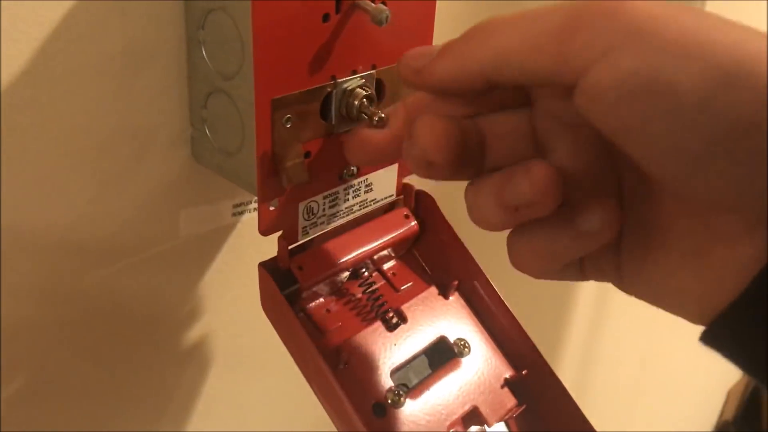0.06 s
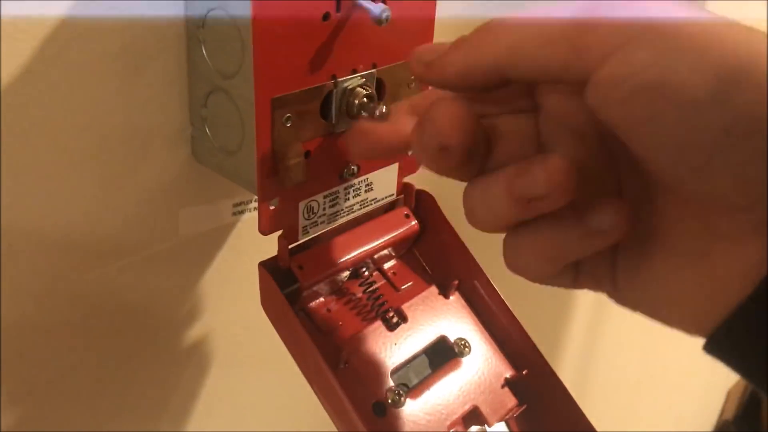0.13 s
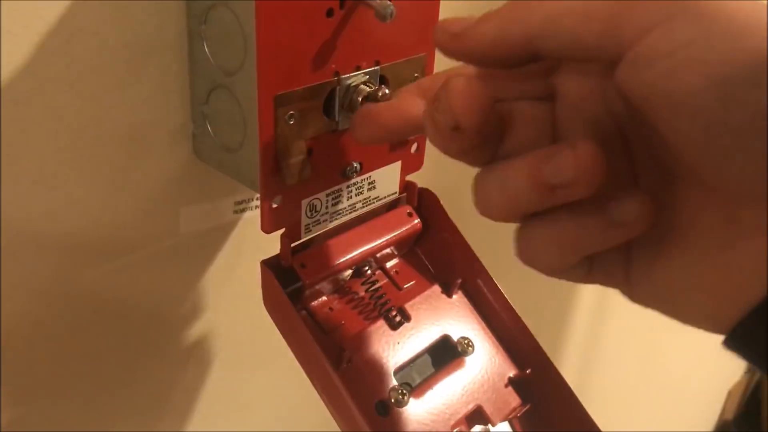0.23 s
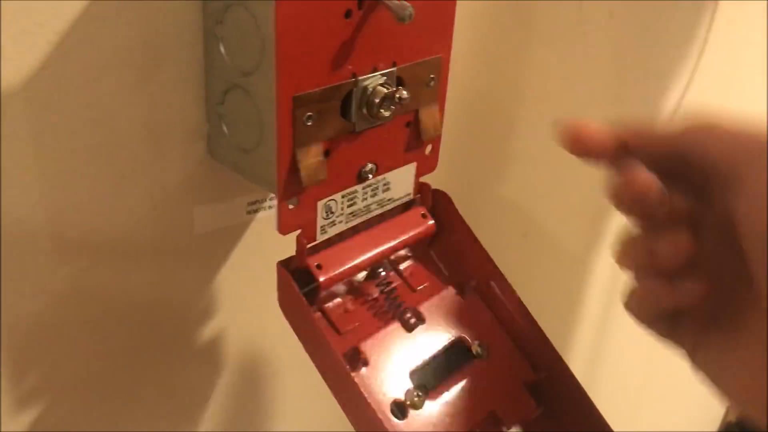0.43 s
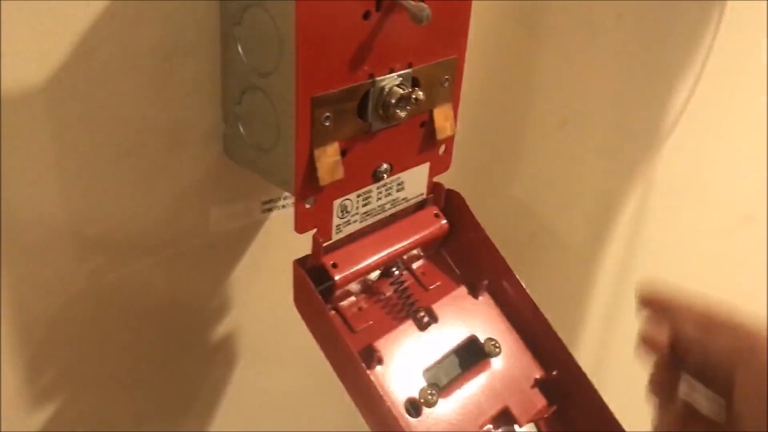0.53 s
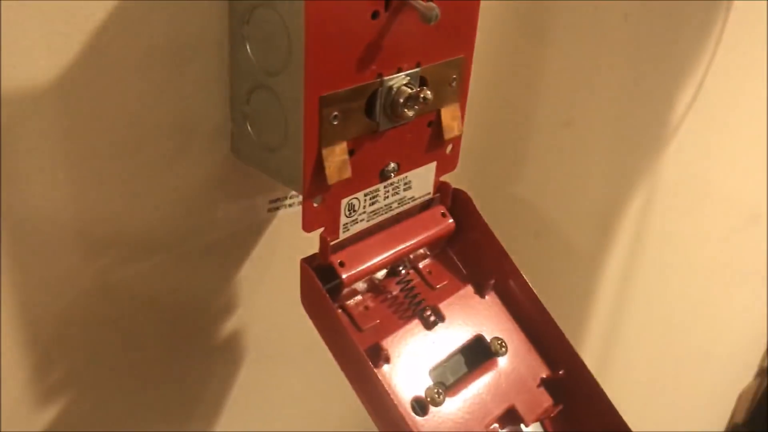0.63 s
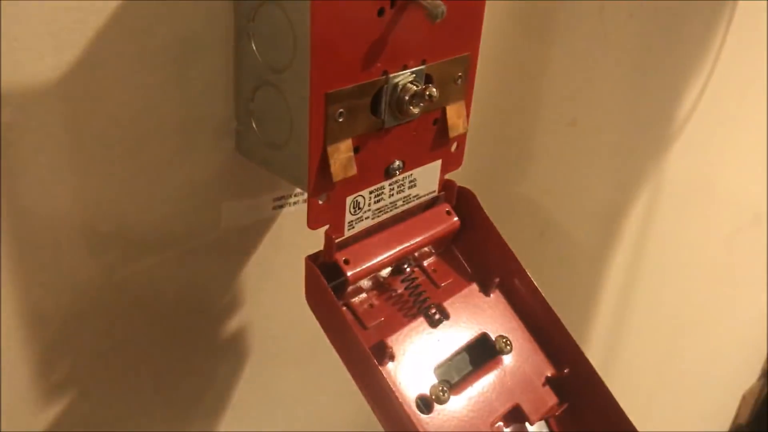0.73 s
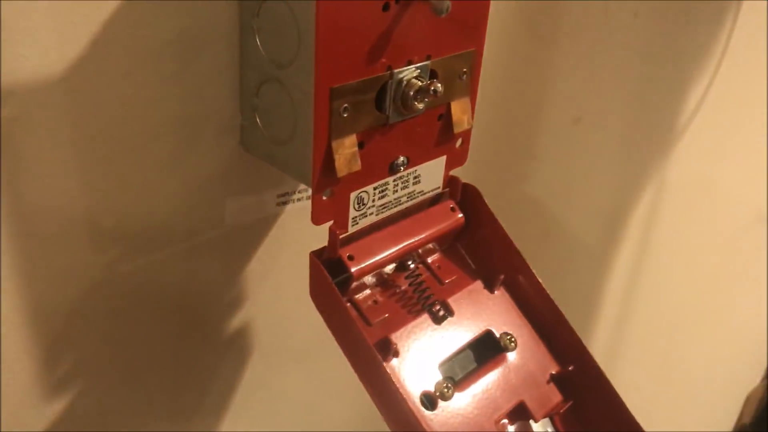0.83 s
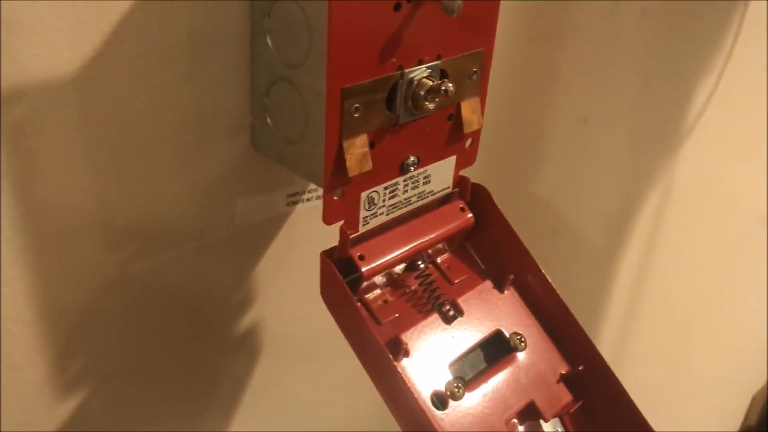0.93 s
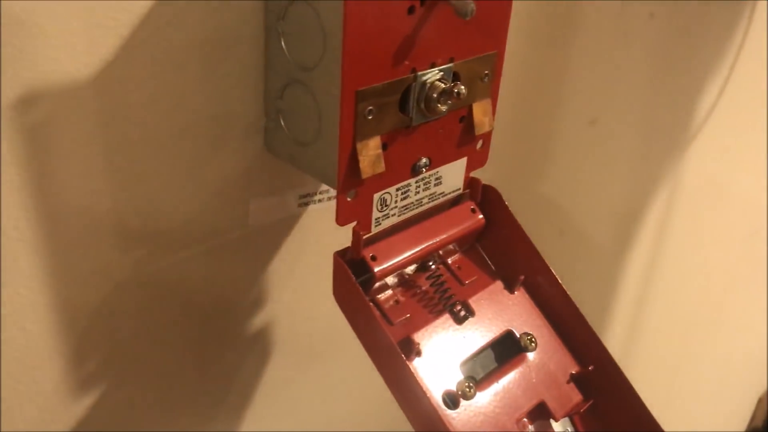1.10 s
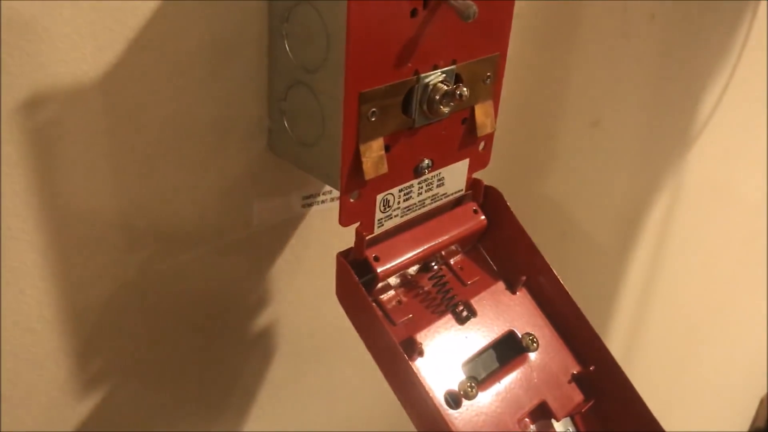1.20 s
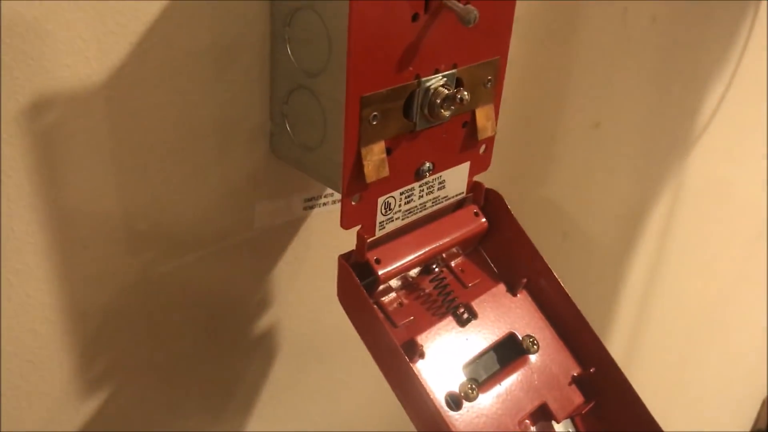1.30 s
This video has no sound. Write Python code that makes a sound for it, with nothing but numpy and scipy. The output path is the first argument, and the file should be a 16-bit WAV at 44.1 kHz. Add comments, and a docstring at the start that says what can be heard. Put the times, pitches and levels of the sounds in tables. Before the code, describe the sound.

A toggle switch snaps once, sharp and bright, at about 0.25 seconds, just after a barely audible fingertip bump and a tiny tick. The snap briefly rings its steel box with a light wall thump, fading in the small room by about 0.6 seconds. From 0.5 to 1.4 seconds come very faint spells of thin, clicking whirr, with another tiny tick near 1.2 seconds, over quiet hiss and hum.

```python
"""A small room hisses and hums faintly. A fingertip bumps softly onto a toggle switch in a steel box
on the wall; a tiny tick, then the sprung contact lands and bounces: one sharp snap.
The snap rings the plate, the box and its open cover, the wall thumps and the room answers.
Short spells of thin, clicking whirr follow; among them the background dips twice
and a second tiny tick sounds."""
import sys
import numpy as np
from scipy import signal
from scipy.fft import rfft, irfft, next_fast_len
from scipy.io import wavfile
from scipy.ndimage import map_coordinates

SR = 44100
rng = np.random.default_rng(int(sys.argv[2]) if len(sys.argv) > 2 else 0)


def unload_audio(sound):
    """Save the sound as a 16-bit wav file, at the path given as the first command line argument."""
    columns = np.transpose(np.atleast_2d(sound))
    # keep every value between -1 and 1, then stretch to whole-number steps
    steps = np.round(np.clip(columns, -1, 1) * 32767)
    wavfile.write(sys.argv[1], SR, steps.astype(np.int16))


N = 59535

# the switch's contact lands, then bounces: t/s, level/dB
CONTACT_HITS = [(.2498, -16.5), (.2521, -24)]


def amp(db):
    """Decibels to gain."""
    return 10 ** (np.asarray(db) / 20)


def unit(x):
    """Scale to rms 1."""
    return x / np.sqrt(np.mean(x ** 2) + 1e-20)


def along(curve, hz):
    """Read a curve of (frequency, value) points on a log frequency axis."""
    freqs, values = np.transpose(curve)
    return np.interp(np.log(hz + 1), np.log(freqs + 1), values)


def since(start):
    """Seconds after a moment, zero before it."""
    return np.maximum(np.arange(N) / SR - start, 0)


def filtered(x, response):
    """Equalise x with a gain that is a function of frequency."""
    size = next_fast_len(N + SR // 2)
    return irfft(rfft(x, size) * response(np.fft.rfftfreq(size, 1 / SR)), size)[:N]


def noise(colour):
    """Noise of rms 1, shaped by a curve of relative levels."""
    return unit(filtered(rng.standard_normal(N), lambda hz: amp(along(colour, hz))))


def decay(t, t60):
    """Exponential fade that loses 60 dB in t60 seconds."""
    return np.exp(-np.log(1000) * t / t60)


def struck(start, rise_s, t60_s):
    """Envelope of a blow: quick attack, exponential decay."""
    t = since(start)
    return (1 - np.exp(-t / rise_s)) * decay(t, t60_s)


def ring(modes, start, rise_s):
    """Damped modes set off together in random phases, with the bass cut well below the lowest."""
    t = since(start)
    partials = sum(amp(db) * struck(start, rise_s, t60) * np.sin(2 * np.pi * (hz * t + rng.random()))
                   for hz, db, t60 in modes)
    low_cut_hz = 0.42 * modes[0][0]
    return signal.sosfilt(signal.butter(2, low_cut_hz, "highpass", fs=SR, output="sos"), partials)


def background():
    """A bed of room tone, hiss and mains hum whose level dips briefly twice."""
    floor_colour = [(15, -37), (25, 1.5), (130, -8.5), (165, -8.5), (425, -14.5), (557, -12.5), (604, -15),
                    (981, -18.5), (1060, -18), (1150, -19), (5520, -22.5), (11100, -19.5), (15800, -21.5)]  # room tone and hiss: f/Hz, relative level/dB
    hum_partials = [(119.7, -78), (241, -87.5), (300, -86.5), (480, -89), (540, -85.5), (661, -89),
                    (721, -89.5)]  # mains harmonics: f/Hz, rms level/dB
    dips = [(.846, 0.011, 10), (.9955, 0.0083, 9)]  # dips in the bed: t/s, half width/s, depth/dB
    t = np.arange(N) / SR
    hum = sum(np.sqrt(2) * amp(db) * np.sin(2 * np.pi * (hz * t + rng.random()))
              for hz, db in hum_partials)
    dip_db = sum(depth * np.exp(-((t - centre) / width) ** 2) for centre, width, depth in dips)
    return (amp(-68) * noise(floor_colour) + hum) * amp(-dip_db)


def whirr(grain_hz=600, roughness_db=3, fade_s=0.03):
    """A small mechanism, like a lens focusing: grainy hiss and clicks share its high resonances."""
    spells = [(0.483, .05, -67.5), (.58, 0.064, -70), (0.777, 0.07, -68), (0.932, 0.12, -68.5),
              (1.154, 0.055, -73), (1.345, .04, -65)]  # spells of whirring: t/s, length/s, level/dB
    click_hits = [(.4946, -54.5), (0.505, -48.5), (0.515, -53), (.522, -48.5), (.5329, -47), (0.9849, -53),
                  (1.0132, -49.5), (1.0635, -52), (1.145, -55.5), (1.1576, -52.5), (1.1792, -50)]  # the mechanism's sharper clicks: t/s, level/dB
    colour = [(2000, -35), (4600, -14), (5350, 4.5), (6000, -5.5), (6800, -1), (7800, -24), (10000, -6),
              (11400, 0.5), (12500, -4.5), (13800, -7), (15800, -17)]  # its resonances: f/Hz, relative level/dB
    t = np.arange(N) / SR
    spell_env = sum(amp(db) * np.clip(np.minimum(t - start, start + length - t) / fade_s + .5, 0, 1)
                    for start, length, db in spells)
    grain = map_coordinates(rng.standard_normal(N), [t * grain_hz])  # smooth random flutter
    grainy_hiss = unit(noise(colour) * amp(roughness_db * grain))
    click_env = sum(amp(db) * struck(start, rise_s=0.00016, t60_s=0.0068) for start, db in click_hits)
    return spell_env * grainy_hiss + click_env * noise(colour)


def ticks(hold_s=0.004, t60_s=0.047):
    """Two tiny bright ticks, each held for an instant before it fades."""
    hits = [(0.2268, -54.5), (1.2265, -56.5)]  # the ticks: t/s, level/dB
    colour = [(500, -5.5), (3000, -15), (6500, -8.5), (7400, 4), (8200, -5), (12000, -3.5), (15800, -6.5)]  # their thin, bright tone: f/Hz, relative level/dB
    envelope = sum(amp(db) * (since(start) > 0) * decay(since(start + hold_s), t60_s)
                   for start, db in hits)
    return envelope * noise(colour)


def fingertip():
    """A soft, dull bump as the finger settles on the lever."""
    colour = [(70, -27), (130, -1), (195, -4.5), (280, -4.5), (380, -32), (1500, -47.5)]  # the bump's low body: f/Hz, relative level/dB
    return amp(-62.5) * struck(start=0.09, rise_s=0.019, t60_s=0.43) * noise(colour)


def room(start, build_s=0.019):
    """A diffuse tail whose treble dies first, and one scattered late reflection off the far wall."""
    colour = [(88, -26), (150, -0.5), (291, -12.5), (333, -19), (397, -13.5), (575, -22), (955, -6),
              (1090, -20.5), (1360, -14), (1590, -21), (2430, -11.5), (4540, -19.5), (6700, -16.5),
              (11600, -17.5), (15800, -38)]  # tone of the reverb: f/Hz, relative level/dB
    decay_times = [(200, 0.49), (1000, 0.39), (2800, 0.36), (6000, 0.33), (12000, .24)]  # length of the tail: f/Hz, t60/s
    hz, t, bands = signal.stft(noise(colour), SR, nperseg=256)
    fade = decay(np.maximum(t - start, 0), along(decay_times, hz)[:, None])
    tail = signal.istft(bands * fade, SR, nperseg=256)[1][:N]
    build_up = 1 - np.exp(-since(start) / build_s)
    reflection = amp(-49.5) * struck(start + 0.051, rise_s=0.0019, t60_s=0.17) * noise(colour)
    return amp(-41) * build_up * tail + reflection


def steel_box(start, fast_rise_s=0.00031, slow_rise_s=0.011):
    """The snap rings the switch plate and the box and, more slowly, the open cover and the wall."""
    sheet_colour = [(90, -37), (180, -18), (300, -8.5), (510, -10), (958, -4), (1400, -13), (1860, -3),
                    (2600, -4.5), (3400, -11.5), (4480, -9.5), (7000, -8.5), (10100, -9), (13000, -13.5),
                    (15800, -26)]  # dense modes of the sheet steel: f/Hz, relative level/dB
    plate_modes = [(4895, -29, .035), (5135, -24.5, .035), (5360, -31, .025), (5950, -40, .05),
                   (6274, -31, .055), (6605, -43, .13), (6735, -25, .025), (6980, -31, .03),
                   (7930, -32, .025), (8548, -30.5, .052), (9145, -29, .028), (9985, -34, .04),
                   (10168, -33, .075), (10980, -29, .022), (11432, -29, .04), (13110, -32, .03),
                   (14060, -33, .024)]  # bright ping of switch and plate: f/Hz, relative level/dB, t60/s
    box_modes = [(835, -42, .06), (956, -21.5, .057), (1117, -39, .13), (1645, -44, .14), (2057, -39, .12),
                 (2360, -37, .095), (2558, -39, .13), (2737, -35, .08), (3052, -28, .065),
                 (3596, -31, .075), (4185, -32.5, .04), (4454, -33, .035)]  # clank of the box: f/Hz, relative level/dB, t60/s
    cover_modes = [(2417, -47, .24), (2512, -49, .26), (2850, -45, .22), (3026, -47, .25), (6590, -49, .17),
                   (10192, -47, .14)]  # lingering ring of the cover: f/Hz, level/dB, t60/s
    wall_modes = [(127, -47, .6), (147, -46, .3), (199, -44, .36), (222, -54, .3), (278, -48, .37),
                  (726, -53, .27), (953, -47, .28), (990, -50, .26)]  # thump of wall and room: f/Hz, relative level/dB, t60/s
    sheet = amp(-29) * struck(start, rise_s=0.0019, t60_s=0.083) * noise(sheet_colour)
    steel = amp(-1) * (ring(plate_modes, start, fast_rise_s) + ring(box_modes, start, fast_rise_s))
    cover = ring(cover_modes, start, slow_rise_s)
    wall = amp(-1) * ring(wall_modes, start, slow_rise_s)
    return steel + sheet + cover + wall


def switch():
    """The sprung contact lands and bounces, each hit a bright, very short crack."""
    colour = [(120, -42), (200, -14), (550, -6.5), (900, -9.5), (1450, -11.5), (2500, -2.5), (3400, -14.5),
              (5200, -10.5), (6800, 0), (8200, -4.5), (11200, -3), (14200, -9.5), (15800, -23)]  # tone of the crack: f/Hz, relative level/dB
    return sum(amp(db) * struck(start, rise_s=0.00044, t60_s=0.018) * noise(colour)
               for start, db in CONTACT_HITS)


def scene():
    """The snap with its box and room, over the small sounds and the quiet bed, in mono."""
    flip_s = CONTACT_HITS[0][0]
    snap = switch() + steel_box(flip_s) + room(flip_s)
    return (snap + fingertip() + ticks() + whirr() + background())[None]


def record(dry):
    """A steep low-pass takes off the very top of the treble."""
    cutoff_hz, edge_hz = 15800, 300
    return filtered(dry[0], lambda hz: np.clip((cutoff_hz - hz) / edge_hz + .5, 0, 1))[None]


dry = scene()
out = record(dry)
unload_audio(out)
```